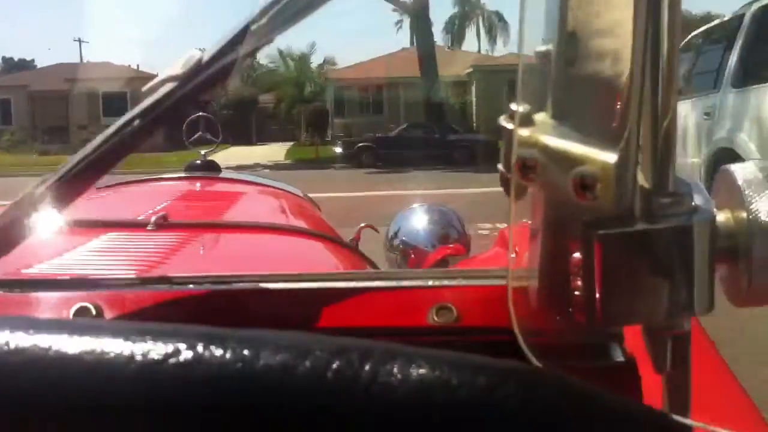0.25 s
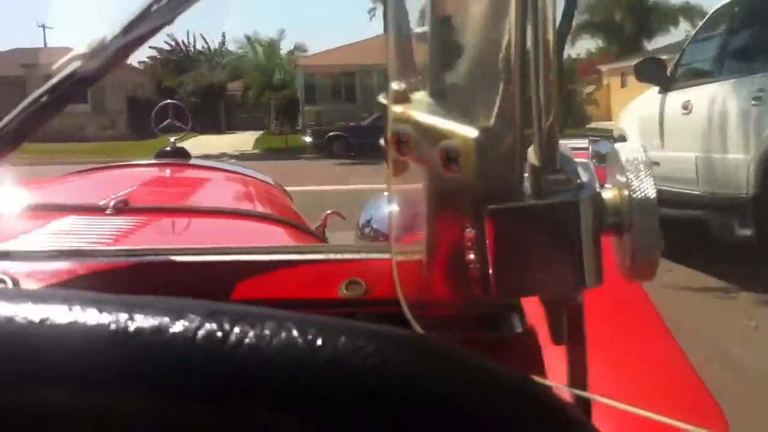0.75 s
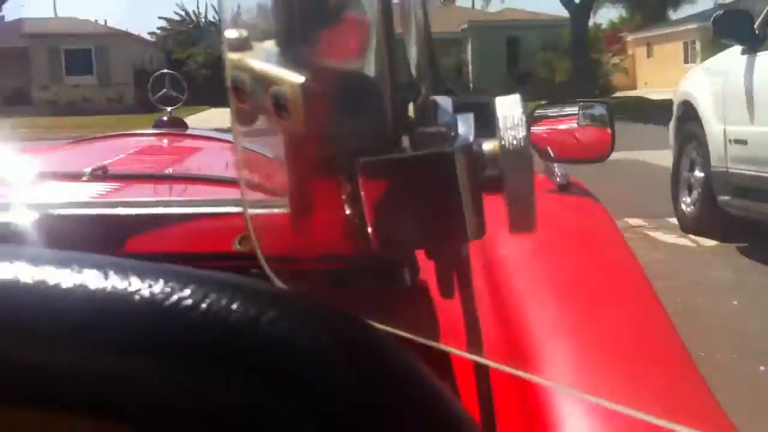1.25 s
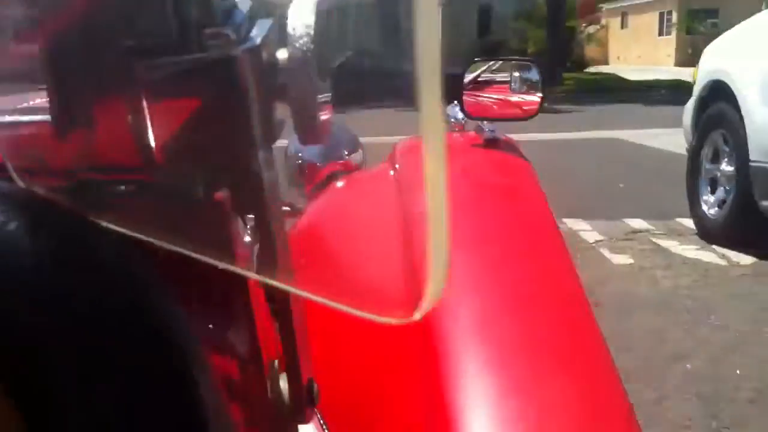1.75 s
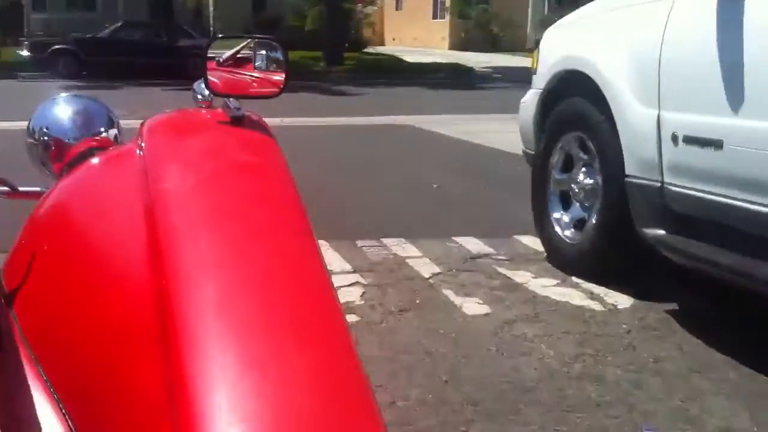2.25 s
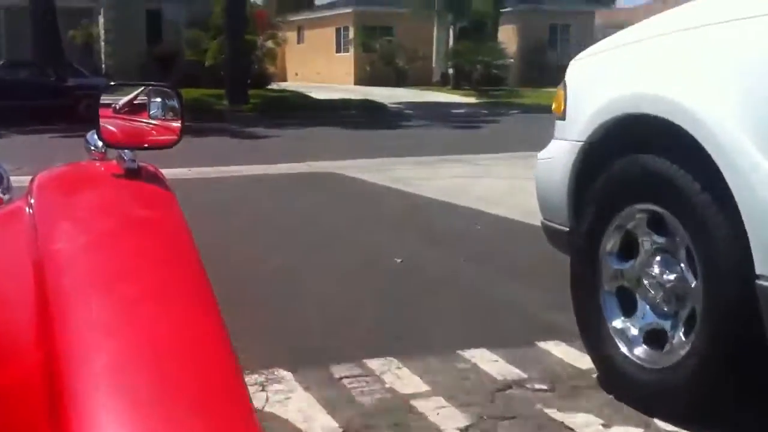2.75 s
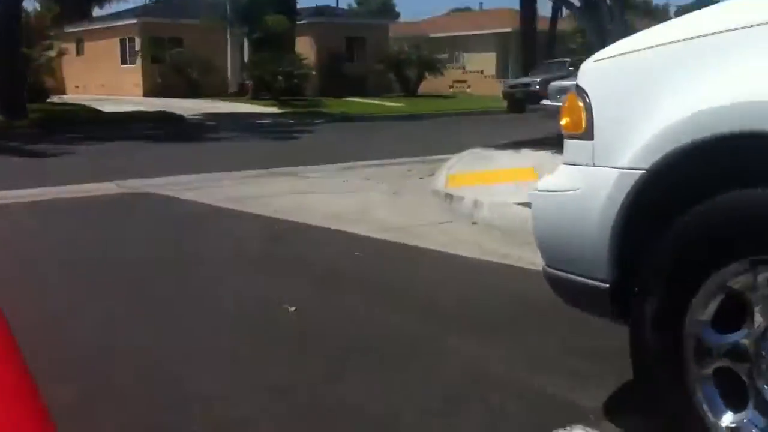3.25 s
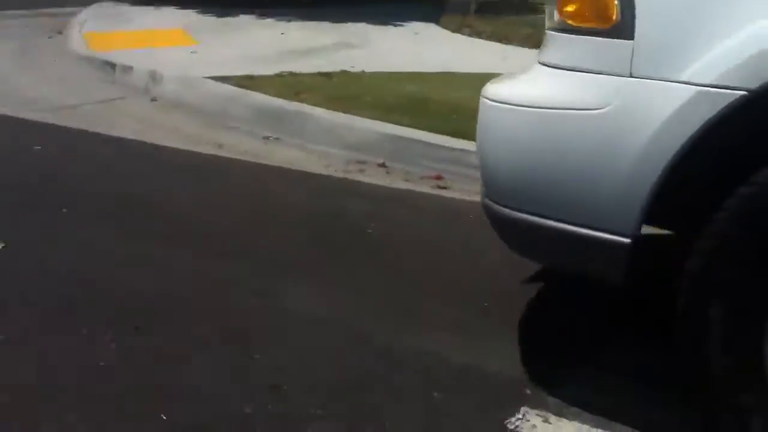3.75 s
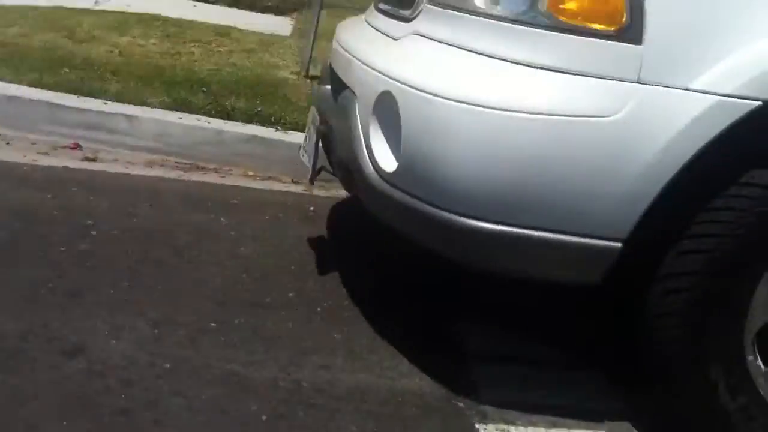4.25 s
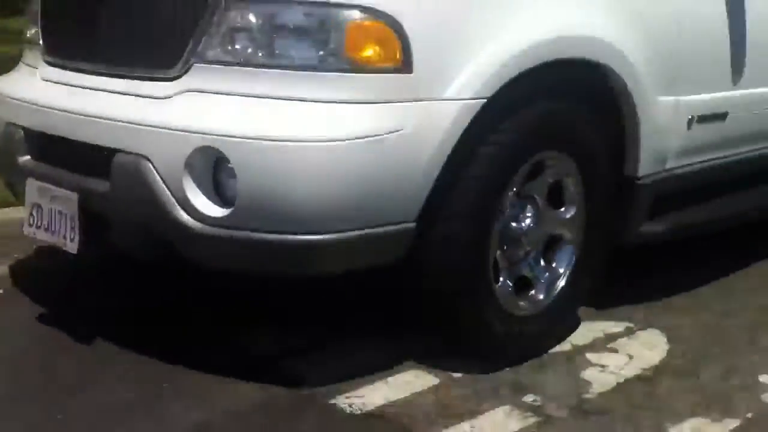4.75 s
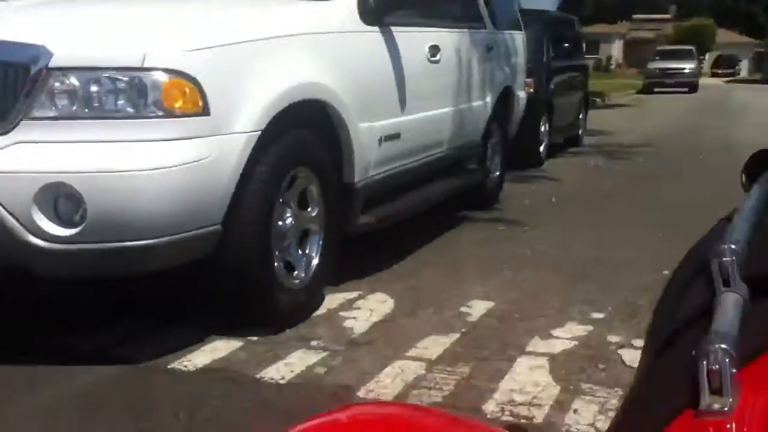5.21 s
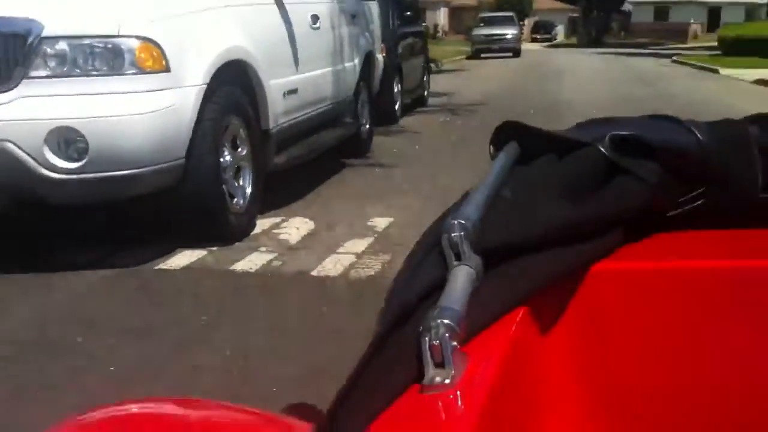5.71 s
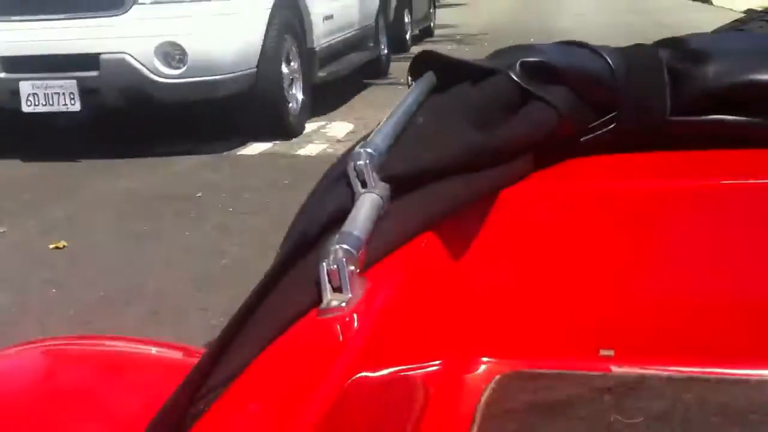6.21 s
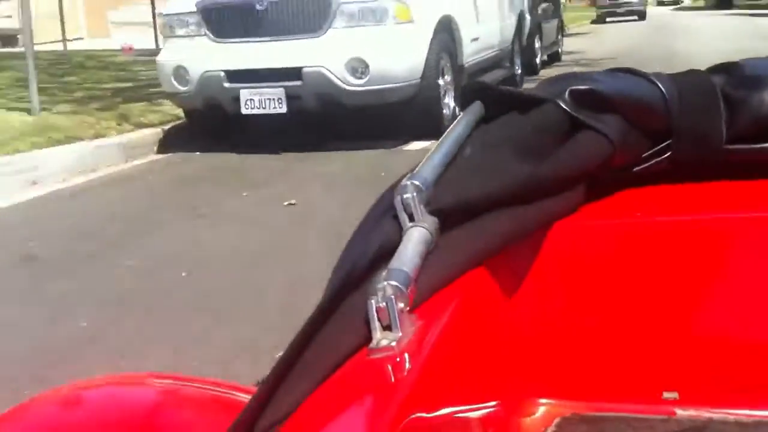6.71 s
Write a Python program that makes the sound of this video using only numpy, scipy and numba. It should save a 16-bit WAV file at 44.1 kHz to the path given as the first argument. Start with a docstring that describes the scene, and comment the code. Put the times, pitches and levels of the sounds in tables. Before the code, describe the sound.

From 0 to 1.6 s a small four-cylinder engine hums low and steady, slightly uneven and burbling, over quiet tyre roar, dry mechanical rustle and fine hiss; a faint wavering gear whine rises around 1 to 1.5 s. The hum slowly sinks in pitch throughout. From about 1.7 s soft low wind flutters and dull thumps touch the close, unprotected microphone. Stronger knocks and sharp slaps cluster between 2.5 and 3.2 s, then sparse, softer puffs leave the engine audible. Single bumps come near 3.8 and 4.1 s, with a rough burst at 4.4 to 4.65 s. A calmer stretch of low hum follows until 5.4 s. Then wind breaks in violently: ragged, crackling, low-heavy blasts with hard snaps, nearly continuous, growing brighter and harsher. It masks the fading engine and is still loud when it cuts off at 7 s.

```python
"""An engine hums first: a small four-cylinder open car rolls along a quiet street, slowly losing revs.
The hum is a sum of firing-cycle harmonics under a pipe resonance; tyres and valve gear rustle as shaped noise.
The microphone is then held out past the windscreen: gusts (noise through a moving low-pass), dull thumps
(short tone bursts) and sharp slaps (pressure steps) buffet it, singly at first, then in a loud ragged
stream that drives its limiter."""
import sys
import numpy as np
from scipy import signal
from scipy.fft import rfft, irfft, next_fast_len
from scipy.io import wavfile
from scipy.ndimage import uniform_filter1d, minimum_filter1d
from numba import njit

SR = 44100
rng = np.random.default_rng(int(sys.argv[2]) if len(sys.argv) > 2 else 0)


def pcm_store(signal):
    """Save signal as 16-bit PCM."""
    levels = np.round(np.clip(np.atleast_2d(signal), -1, 1) * 32767)
    wavfile.write(sys.argv[1], SR, levels.astype(np.int16).T)


N = 307377
TIME = np.arange(N) / SR

# engine speed: (time [s], four-stroke cycle rate [Hz])
ENGINE_SPEED = [(0, 11.38), (.35, 11.38), (.75, 11.2), (1.05, 11.35), (1.5, 10.87), (2, 10.25), (2.5, 9.8),
                (3.1, 9.48), (3.8, 9.0), (4.8, 8.4), (5.4, 8.25), (6.97, 8.2)]


def engine_rotation():
    """Phase is the integral of frequency: cycle rate and accumulated, slightly unsteady cycle angle."""
    cycle_hz, = in_time(ENGINE_SPEED)
    unsteady_hz = cycle_hz * (1 + 0.002 * drift(11.3))
    return cycle_hz, 2 * np.pi * np.cumsum(unsteady_hz) / SR


# level of the hum, which also scales the rough part: (time [s], level [dB])
HUM_LEVEL = [(0, -25), (.5, -24.5), (1.05, -25.5), (1.35, -28.5), (1.8, -28.5), (2.7, -27), (3.3, -32.5),
             (4.2, -30.5), (4.85, -32.5), (5.3, -27.5), (6.97, -51.5)]
# uneven firing: (multiple of the cycle rate, relative level [dB])
FIRING_ORDERS = [(6, -14.5), (8, 1.5), (10, -8), (12, -5.5), (14, -1), (15, -13.5), (16, -5), (17, -19.5),
                 (18, 1.5), (19, -1.5), (20, -1), (21, -17.5), (22, 3), (23, -1.5), (24, 1.5), (26, -3.5)]
# exhaust pipe and body boom: (frequency [Hz], gain [dB])
PIPE_BOOM = [(40, -59), (65, -18.5), (90, -10), (130, -5), (170, -3.5), (200, -3), (245, -9.5),
             (290, -26.5), (400, -26)]
# colour of the rough exhaust gas: (frequency [Hz], relative density [dB per Hz])
RUMBLE_COLOUR = [(30, -40), (52, -29), (75, -29), (130, 8.5), (210, 11), (280, -2), (350, 3.5), (430, -6.5),
                 (540, -18), (1000, -50)]
# rough part before its puffs: (time [s], level relative to the hum [dB])
EXHAUST_ROUGHNESS = [(0, -8.5), (1.0, -7), (1.35, -8.5), (2.0, 5), (3.3, -5.5), (4.8, -3), (5.2, -6),
                     (6.97, -11)]
CYLINDERS, STROKE_S = 4, .018
STRONG_STROKE = .33  # when the strongest cylinder fires, as a share of the cycle
PIPE_LAG_S_PER_HZ = .000224  # higher tones leave the pipe later


def exhaust(cycle_hz, turn, unsteady=0.086, firing_db=-9, evenness=0.59):
    """Source and filter with dispersion: harmonics under a fixed boom, each beat drawn into a rising burble."""
    hum = np.zeros(N)
    for order, db in FIRING_ORDERS:
        order = round(order)
        hz = order * cycle_hz
        gain = from_db(db + at_hz(PIPE_BOOM, hz)) * (1 + unsteady * drift(3.9))
        lag = np.pi * PIPE_LAG_S_PER_HZ * hz ** 2  # a delay proportional to frequency
        hum += gain * np.cos(order * (turn - 2 * np.pi * STRONG_STROKE) - lag)
    stroke_power = smooth(hum ** 2, STROKE_S) + 1e-12
    hum /= stroke_power ** (evenness / 2)  # the strokes come closer to equal energy
    puffs = 1 + from_db(firing_db) * np.cos(CYLINDERS * turn)  # one puff of rough gas per firing
    roughness_db, = in_time(EXHAUST_ROUGHNESS)
    rough = from_db(roughness_db) * puffs * noise(RUMBLE_COLOUR)
    level_db, = in_time(HUM_LEVEL)
    return from_db(level_db) * (rms_one(hum) + rough)


def wind(port_hz=92):
    """Superposition of all air pressures, high-passed by a small microphone that passes no deep bass."""
    pressure = buffeting() + thumps() + slaps() + crackle() + whistle()
    return signal.sosfilt(signal.butter(4, port_hz, "high", fs=SR, output="sos"), pressure)


# steady airflow over the microphone: (time [s], force [dB])
BREEZE_FORCE = [(1.6, -41), (1.7, -26.5), (2.3, -21), (2.7, -31), (3.0, -19), (3.25, -48), (3.9, -23.5),
                (4.28, -28), (4.55, -11.5), (4.8, -34), (5.35, -28), (5.9, -15), (6.2, -14.5),
                (6.97, -26.5)]
# gusts: (start [s], length [s], force [dB])
GUST_FORCES = [(1.69, 0.036, -17.5), (1.856, 0.12, -20.5), (2.045, 0.12, -22), (2.232, 0.022, -19),
               (2.29, 0.055, -16.5), (2.532, 0.052, -9.5), (2.749, 0.021, -10.5), (2.774, 0.024, -4.5),
               (2.907, 0.022, -13.5), (2.974, 0.047, -12.5), (3.036, 0.014, -9), (3.087, 0.026, -6.5),
               (3.118, 0.024, -3.5), (3.147, 0.015, -12), (3.183, 0.022, -15), (3.365, 0.053, -19),
               (3.678, 0.09, -19), (3.798, 0.027, -9.5), (3.9, 0.062, -24), (4.391, 0.018, -10.5),
               (4.454, 0.021, -14.5), (4.515, 0.048, -4), (4.593, 0.063, -8), (5.448, 0.053, -12.5),
               (5.493, 0.021, -9.5), (5.531, 0.034, -7.5), (5.57, 0.052, -5), (5.652, .013, -6),
               (5.665, 0.04, -2.5), (5.707, 0.015, -11.5), (5.757, 0.041, -4.5), (5.792, 0.047, -12),
               (5.858, 0.01, -7), (5.873, 0.016, -3.5), (5.918, 0.016, -6), (5.938, 0.049, 2),
               (5.987, 0.044, -5), (6.035, 0.033, 4), (6.076, 0.042, -2), (6.128, 0.031, -4),
               (6.159, 0.035, -3.5), (6.193, 0.031, -17), (6.256, 0.021, -10), (6.299, 0.03, -3.5),
               (6.339, 0.051, -10.5), (6.375, 0.041, -5.5), (6.402, 0.061, -7.5), (6.466, 0.052, -2),
               (6.546, 0.033, -14), (6.622, 0.018, -4), (6.681, 0.011, -10), (6.699, 0.058, -5),
               (6.76, 0.059, -4.5), (6.815, 0.016, -2.5), (6.831, 0.044, 11), (6.88, .04, 0.5),
               (6.917, 0.049, -1)]


def air_force(edge_s=0.0017):
    """Power addition: soft-edged gusts ride on the breeze; returns the force of the air in dB."""
    breeze = from_db(in_time(BREEZE_FORCE)[0])
    gusts = np.zeros(N)
    for start, length, db in GUST_FORCES:
        blowing = (TIME >= start) & (TIME < start + length)
        gusts[blowing] = from_db(db)
    return 20 * np.log10(np.hypot(breeze, smooth(gusts, edge_s)) + 1e-9)


# eddy pressure at the microphone port: (frequency [Hz], relative density [dB per Hz])
EDDY_COLOUR = [(30, -55), (55, -26), (100, -5), (160, -4.5), (250, 0.5), (500, -8), (1000, -12.5),
               (2000, -19), (4000, -48), (8000, -34), (16000, -70)]
# smaller, rougher eddies of the full slipstream: (frequency [Hz], relative density [dB per Hz])
SLIPSTREAM_COLOUR = [(30, -65), (65, -45), (100, -14.5), (150, 4.5), (250, 2), (350, 2), (500, -1.5),
                     (1000, -6), (2000, -11.5), (4000, -21.5), (8000, -45), (16000, -61)]
# how far the microphone is out in the slipstream: (time [s], power share [0-1])
SLIPSTREAM_SHARE = [(0, 0.25), (2.3, 0.07), (2.9, 0.94), (3.5, 0.6), (4.0, 0.34), (4.7, 0.14), (5.4, 0.89),
                    (6.97, 0.93)]
FULL_GUST_DB = -10.5  # strength levels off here; a harder gust mainly gets sharper
# above a soft gust the eddies quicken with its force
SOFT_GUST_DB, SOFT_EDDY_HZ, DB_PER_OCTAVE = -16.5, 756, 12


def buffeting(lumpy_db=2.5, snap_db=2.0, damping=2.055):
    """Turbulent pressure: the harder the air blows, the louder and then the sharper the eddies get."""
    force_db, swirl = air_force(), swirls()
    exposed, = in_time(SLIPSTREAM_SHARE)
    pressure = np.sqrt(1 - exposed) * noise(EDDY_COLOUR) + np.sqrt(exposed) * noise(SLIPSTREAM_COLOUR)
    lumpy = evened(pressure * from_db(lumpy_db * swirl))
    strength = from_db(force_db) / np.hypot(1, from_db(force_db - FULL_GUST_DB))
    octaves = np.maximum(force_db - SOFT_GUST_DB, 0) / DB_PER_OCTAVE
    eddy_hz = SOFT_EDDY_HZ * 2 ** octaves
    corner_hz = np.clip(eddy_hz * from_db(snap_db * swirl), 100, 12000)
    return moving_lowpass(strength * lumpy, np.tan(np.pi * corner_hz / SR), damping)


def swirls(per_s=220, life_s=0.0021, gust_s=0.035):
    """Shot noise: small eddies arrive abruptly at random and die away; mean near 0, spread about 1."""
    arrivals = (rng.random(N) < per_s / SR) * 1.
    kicks = smooth(fade(arrivals, life_s), .0004)
    return np.clip(rms_one(kicks - smooth(kicks, gust_s)), -2, 2.6)


# single large eddies: (centre time [s], level [dB], bell half-width [s], frequency [Hz])
THUMP_EVENTS = [(1.838, -18, 0.0035, 480), (1.896, -12.5, 0.0024, 260), (1.94, -9.5, 0.0021, 271.4),
                (2.059, -14, 0.0037, 238), (2.089, -8, 0.0018, 420), (2.098, -7.5, 0.0032, 270),
                (2.135, -5, 0.0053, 230), (2.241, -15, 0.0022, 400), (2.329, -17, 0.0031, 330),
                (2.558, -11, 0.0041, 252), (2.981, -3.5, 0.0077, 165.7), (3.125, 1, 0.0039, 340),
                (3.396, -17, 0.0041, 318), (3.41, -18, 0.0036, 240), (3.469, -17.5, 0.0041, 260),
                (3.685, -10.5, 0.0031, 220), (4.071, -11, 0.012, 165), (4.132, -8, 0.0018, 279.8),
                (4.413, -12.5, 0.0099, 175), (4.457, -5, 0.0057, 210), (4.612, -5, 0.0042, 157.2),
                (4.64, -8.5, 0.012, 170), (5.486, -13, 0.0037, 290), (5.546, -9, 0.0029, 280),
                (5.59, -0.5, 0.01, 310), (5.655, -8, 0.0028, 400), (5.852, -2, 0.0063, 184),
                (5.958, -7, 0.0046, 300), (6.183, -8, 0.0065, 190), (6.21, -14, 0.013, 210.7),
                (6.312, -7.5, 0.0022, 280), (6.721, -6.5, 0.0035, 230), (6.773, -12, 0.0027, 220)]
# ragged part of a thump: (frequency [Hz], relative density [dB per Hz])
RAGGED_COLOUR = [(30, -43), (100, 3.5), (200, 9.5), (350, 4.5), (700, -6), (1500, -30), (6000, -100)]


def thumps(ragged_db=-4.5):
    """Tone burst: a large slow eddy rocks the pressure to and fro and fades within a few cycles."""
    ragged = from_db(ragged_db) * evened(noise(RAGGED_COLOUR))
    out = np.zeros(N)
    for s, db, length, hz in THUMP_EVENTS:
        push = np.sin(2 * np.pi * hz * TIME + rng.uniform(0, 2 * np.pi))
        out += from_db(db) * swell(s, length) * (push + ragged)
    return out


# sharp slaps of air: (start [s], level before step and crack gains [dB], crack top [Hz], crack decay [s])
SLAP_EVENTS = [(2.237, -17, 1000, .003), (2.7821, -20, 2200, 0.0025), (2.789, -14, 2340, .003),
               (2.925, -20.5, 1890, 0.0018), (2.978, -13.5, 1900, 0.0048), (3.036, -16, 2240, .004),
               (3.1197, -16.5, 4200, 0.003), (3.198, -16.5, 1900, 0.0038), (3.392, -21.5, 1710, 0.0027),
               (3.809, -14, 2100, 0.0071), (4.132, -21, 1100, .002), (4.4, -21, 2000, 0.0038),
               (4.456, -14.5, 2260, 0.0026), (4.513, -23, 1900, .0012), (4.5295, -19, 3260, 0.0018),
               (4.541, -13, 2770, 0.0025), (4.5537, -26, 2900, .001), (4.56, -28, 2980, .002),
               (4.58, -19, 2480, 0.00062), (4.607, -21, 3150, 0.015), (4.64, -25, 3000, 0.0025),
               (5.4607, -15.5, 1890, 0.0012), (5.539, -3, 2070, 0.0017), (5.577, -15, 2880, 0.0025),
               (5.583, -14, 3400, 0.0024), (5.599, -25, 2700, .002), (5.672, -4, 2870, 0.0026),
               (5.6823, -15, 3600, 0.0027), (5.69, -22, 2700, 0.0024), (5.711, -25, 3900, .003),
               (5.724, -25, 3970, 0.00081), (5.7581, -18.5, 4330, 0.0027), (5.788, -25, 4170, 0.0011),
               (5.8768, -18, 3350, 0.003), (5.924, -13, 2000, .002), (5.943, -19, 5040, 0.0025),
               (5.9487, -17.5, 4800, 0.0034), (5.968, -24, 4400, .002), (6.009, -29, 3900, .001),
               (6.0375, -20, 5200, 0.0015), (6.0494, -14, 4700, 0.00089), (6.061, -23, 4400, 0.0043),
               (6.0822, -19, 5000, 0.00097), (6.097, -19, 4400, 0.0022), (6.123, -15.5, 4420, 0.002),
               (6.168, -21, 6100, 0.0014), (6.2293, -23.5, 3700, 0.00038), (6.306, -19, 2750, .002),
               (6.3557, -23, 3900, 0.00091), (6.3836, -17, 4170, 0.0017), (6.392, -20, 4900, 0.0015),
               (6.4203, -20, 3400, .002), (6.4666, -26, 4000, .001), (6.497, -21, 4000, 0.0012),
               (6.546, -21, 2540, 0.00087), (6.556, -15, 3630, 0.0017), (6.625, -21, 3360, 0.0015),
               (6.7059, -18, 4100, 0.0015), (6.736, -15.5, 3370, 0.0033), (6.766, -18.5, 4070, 0.002),
               (6.812, -17, 5500, 0.0011), (6.8356, -15, 5770, 0.003), (6.852, -24, 4800, 0.0013),
               (6.8575, -18, 6200, .0012), (6.865, -18, 6100, 0.002), (6.904, -20.5, 5360, .002),
               (6.9231, -14.5, 5200, 0.002), (6.9373, -16, 5560, 0.0028)]


def slaps(step_db=15.5, crack_db=-7.5, leak_s=0.00021, crack_span=4.3, step_share=0.63):
    """Impulsive loading: an eddy breaking on the port is a pressure step and a ragged crack that dies away."""
    age = TIME[:SR // 20]
    out = np.zeros(N + len(age))
    for s, db, top_hz, decay_s in SLAP_EVENTS:
        band = signal.butter(4, [top_hz / crack_span, top_hz], "band", fs=SR, output="sos")
        crack = signal.sosfilt(band, np.exp(-age / decay_s) * rng.standard_normal(len(age)))
        crack *= from_db(crack_db) / np.abs(crack).max()
        soften = signal.butter(5, step_share * top_hz, fs=SR, output="sos")
        step = signal.sosfilt(soften, np.exp(-age / leak_s))
        step *= from_db(step_db) * rng.choice([-1, 1])
        start = int(s * SR)
        out[start:start + len(age)] += from_db(db) * (crack + step)
    return out[:N]


def crackle(per_s=110, low_hz=700, top_hz=2400):
    """Random impulses: small eddies break in separate ticks, more often and stronger with the air's force."""
    force = np.minimum(from_db(air_force()), 1)
    breaks = rng.random(N) < per_s * force / SR
    impulses = breaks * force ** 2 * rng.choice([-1, 1], N)
    ticks = signal.sosfilt(signal.butter(1, low_hz, "high", fs=SR, output="sos"), impulses + 1e-18)
    return signal.sosfilt(signal.butter(4, top_hz, fs=SR, output="sos"), ticks)


# air whistling across the edge of the port: (centre time [s], bell half-width [s], level [dB], frequency [Hz])
EDGE_TONE = (3.1225, .004, -15.5, 1730)


def whistle():
    """Edge tone: a burst of sine so short that it sounds like a knock."""
    s, length, db, hz = EDGE_TONE
    return from_db(db) * swell(s, length) * np.sin(2 * np.pi * hz * TIME)


# road and engine bay, before trims and ducking:
# (time [s], tyre roar level [dB], mechanical rustle level [dB], fine hiss level [dB])
ROAD_LEVELS = [(0.0, -43, -47, -46), (0.54, -42, -45.5, -45.5), (1.14, -40.5, -44.5, -43.5),
               (1.73, -42, -46.5, -47.5), (2.71, -41, -46, -41.5), (2.96, -43.5, -48.5, -47),
               (3.32, -50.5, -51, -45.5), (3.92, -43, -47.5, -48.5), (4.89, -51.5, -53, -50),
               (5.4, -56, -52, -45)]
# road and engine-bay noise held down under the strong wind: (time [s], gain [dB])
WIND_DUCKING = [(0, -0.5), (5.45, 2.5), (5.75, -3), (6.2, -7), (6.97, -5.5)]
# their colours, each: (frequency [Hz], relative density [dB per Hz])
TYRE_COLOUR = [(250, -10), (500, -3.5), (720, -0.5), (900, 1), (1120, -3.5), (1400, -7.5), (2000, -15.5),
               (2500, -13), (3200, -35), (6000, -28.5)]
RUSTLE_COLOUR = [(1200, 7), (2000, 10.5), (3200, 1.5), (4500, 0), (5400, -5), (6300, 1), (7500, -10),
                 (10000, -39)]
HISS_COLOUR = [(5000, 5), (8000, 1.5), (10000, -1.5), (11200, -6.5), (13000, -2.5), (16000, -13)]


def running_noise(turn, throb_db=0.62, tyres_db=1.0, rustle_db=2.0, hiss_db=-5.5, patchy_db=1.5):
    """Amplitude modulation: tyre roar and engine-bay noise swell with the strokes of each cycle."""
    tyres, rustle, hiss = in_time(ROAD_LEVELS)
    strokes = sum(np.cos(k * turn + rng.uniform(0, 2 * np.pi)) for k in (2, 3, 4, 6))
    throb = throb_db * strokes + patchy_db * drift(14.0)
    tyre_swell = patchy_db * drift(16.0) + .5 * throb
    out = from_db(tyres + tyres_db + tyre_swell) * noise(TYRE_COLOUR)
    out += from_db(rustle + rustle_db + throb) * noise(RUSTLE_COLOUR)
    out += from_db(hiss + hiss_db + throb) * noise(HISS_COLOUR)
    return out * from_db(in_time(WIND_DUCKING)[0])


# reflection off the bodywork beside the microphone: (time [s], delay [s], strength [0-1])
BODY_REFLECTION = [(0, 0.00025, 0.15), (1.1, 0.00023, 0.2), (2.0, 0.00022, 0.14), (2.9, 0.00015, 0.02),
                   (3.7, .0002, 0.29), (4.3, 0.00021, 0.5), (5.3, 0.00018, 0.22), (6.97, 0.00016, 0.07)]


def off_bodywork(x):
    """Comb filtering: the near reflection adds a shifting hollow colour."""
    delay_s, strength = in_time(BODY_REFLECTION)
    reflected = np.interp(TIME - delay_s, TIME, x)
    return (x + strength * reflected) / np.sqrt(1 + strength ** 2)


# gear tones: (multiple of the cycle rate, relative level [dB])
GEAR_TONES = [(50, -22.5), (68, 5), (80, 5), (98, 2), (166, -4), (360, -25), (401, -14)]
# loudness of the whirr: (time [s], level [dB])
WHIRR_LEVEL = [(0, -46), (.8, -49), (.95, -39.5), (1.15, -56), (1.5, -43), (1.8, -60), (3.0, -50.5),
               (5.4, -47.5)]


def whirr(turn, flutter_hz=24):
    """Narrowband modulation: gears sing in unsteady tones that follow the engine."""
    tones = np.zeros(N)
    for k, db in GEAR_TONES:
        in_phase = drift(flutter_hz) * np.cos(k * turn)
        quadrature = drift(flutter_hz) * np.sin(k * turn)
        tones += from_db(db) * (in_phase + quadrature)
    return from_db(in_time(WHIRR_LEVEL)[0]) * rms_one(tones)


# gear tones that sing out: (centre time [s], bell half-width [s], multiple of the cycle rate, level [dB])
GEAR_WHINES = [(.95, .035, 78, -41), (1.14, .17, 98.4, -38), (1.45, .26, 80.5, -39)]


def whines(turn, waver_rad=1.25, waver_hz=22):
    """Phase modulation: a wavering gear tone swells out of the whirr and follows the revs."""
    out = np.zeros(N)
    for s, length, k, db in GEAR_WHINES:
        tone = np.sin(k * turn + waver_rad * drift(waver_hz))
        out += from_db(db) * swell(s, length) * tone
    return out


# air past the bodywork: (centre time [s], bell half-width [s], level [dB], centre frequency [Hz])
AIR_SWISHES = [(.81, .045, -46, 2000), (.89, .04, -49, 5000), (1.25, .25, -52, 4500),
               (3.65, .07, -52, 4300), (4.045, .03, -51, 4400), (4.497, .014, -49, 4400)]


def swishes(span=1.09):
    """Band-limited noise: soft, narrow swells of hiss."""
    out = np.zeros(N)
    for s, length, db, hz in AIR_SWISHES:
        band = signal.butter(2, [hz / span, hz * span], "band", fs=SR, output="sos")
        hiss = rms_one(signal.sosfilt(band, rng.standard_normal(N)))
        out += from_db(db) * swell(s, length) * hiss
    return out


# light brushes on the camera: (centre time [s], bell half-width [s], level [dB])
LIGHT_BRUSHES = [(1.672, .004, -47), (4.05, 0.019, -43.5), (4.592, 0.0021, -42)]


def brushes():
    """Friction noise: short, faint, bright scuffs."""
    envelope = sum(from_db(db) * swell(s, length) for s, length, db in LIGHT_BRUSHES)
    return envelope * noise(HISS_COLOUR)


def from_db(db):
    """Logarithmic level: decibels to amplitude gain."""
    return 10 ** (np.asarray(db) / 20)


def rms_one(x):
    """Normalisation: scale to unit mean power."""
    return x / np.sqrt(np.mean(x ** 2) + 1e-20)


def in_time(rows):
    """Linear interpolation: each column of a curve, joined by straight lines."""
    s, *columns = np.transpose(rows)
    return [np.interp(TIME, s, c) for c in columns]


def at_hz(points, hz):
    """Logarithmic pitch scale: read a spectrum on a log-frequency axis."""
    f, db = np.transpose(points)
    return np.interp(np.log(np.maximum(hz, 1)), np.log(f), db)


def noise(spectrum):
    """Spectral shaping: white noise given a colour, at unit power."""
    size = next_fast_len(N)
    hz = np.arange(size // 2 + 1) * SR / size
    white = rfft(rng.standard_normal(size))
    return rms_one(irfft(white * from_db(at_hz(spectrum, hz)), size)[:N])


def drift(rate):
    """Low-passed randomness: smooth wandering of spread about 1 with its corner near rate [Hz]."""
    hop = 40  # samples between the points of the slow curve
    r = np.exp(-2 * np.pi * hop * rate / SR)
    slow = signal.lfilter([1], [1, -2 * r, r * r], rng.standard_normal(N // hop + 2002))
    slow = slow[2000:]  # drop the filter's run-in
    return np.interp(np.arange(N) / hop, np.arange(len(slow)), rms_one(slow))


def smooth(x, seconds):
    """Triangular moving average (two equal boxes), kept from going negative."""
    width = max(int(seconds * SR), 1)
    return np.maximum(uniform_filter1d(uniform_filter1d(x, width), width), 0)


def fade(x, seconds):
    """Relaxation: every kick dies away exponentially."""
    return signal.lfilter([1], [1, -np.exp(-1 / (seconds * SR))], x + 1e-18)


def evened(x, seconds=0.026):
    """Automatic gain: hold the short-term power near one."""
    return x / np.sqrt(smooth(x ** 2, seconds) + 1e-9)


def swell(s, length):
    """Gaussian envelope: a bell-shaped rise and fall around a moment."""
    return np.exp(-((TIME - s) / length) ** 2)


@njit
def moving_lowpass(x, step, damping):
    """State-variable filter: two two-pole low-passes in series whose corner moves from sample to sample."""
    out, low, band = np.empty(len(x)), np.zeros(2), np.zeros(2)
    for i in range(len(x)):
        v, g = x[i], step[i]
        for k in range(2):
            slope = (band[k] + g * (v - low[k])) / (1 + g * (g + damping))
            v = low[k] + g * slope
            band[k], low[k] = 2 * slope - band[k], 2 * v - low[k]
        out[i] = v
    return out


def scene():
    """Superposition: engine, wind and road add at one microphone."""
    cycle_hz, turn = engine_rotation()
    engine = exhaust(cycle_hz, turn) + whirr(turn) + whines(turn)
    road = off_bodywork(running_noise(turn))
    return (engine + wind() + road + swishes() + brushes())[None]


def record(dry, ceiling=.7, cutoff_hz=15800):
    """Gain reduction and band-limiting: a fast look-ahead limiter holds the gusts down; the top is cut."""
    needed = ceiling / np.maximum(np.abs(dry[0]), ceiling)
    gain = smooth(minimum_filter1d(needed, size=177), .002)  # window in samples, centred: it looks ahead
    top_cut = signal.ellip(12, .1, 80, cutoff_hz, fs=SR, output="sos")
    return signal.sosfilt(top_cut, dry * gain)


dry = scene()
out = record(dry)
pcm_store(out)
```